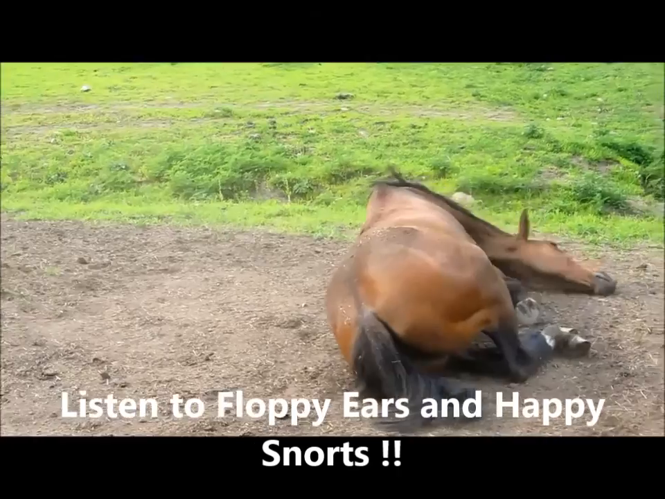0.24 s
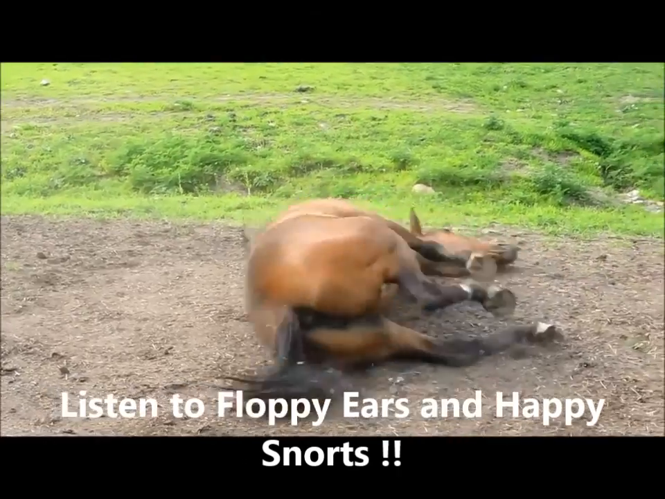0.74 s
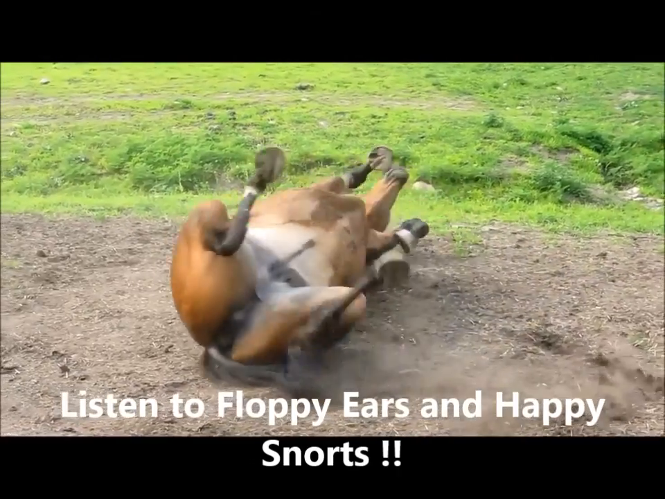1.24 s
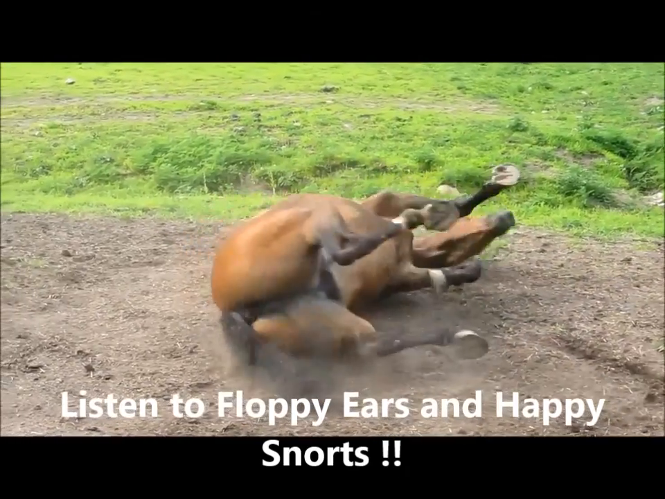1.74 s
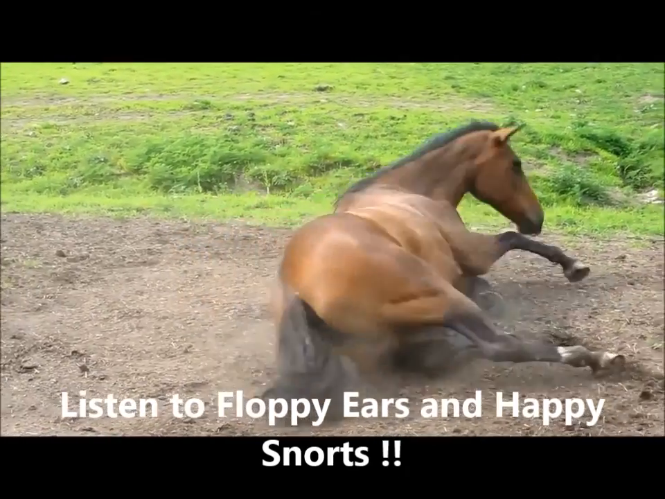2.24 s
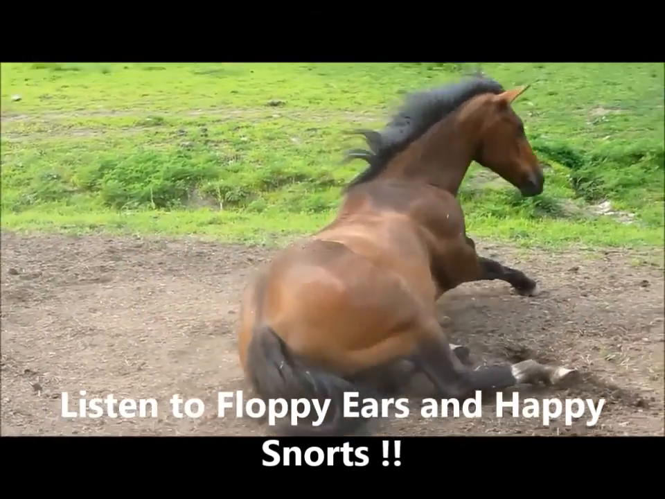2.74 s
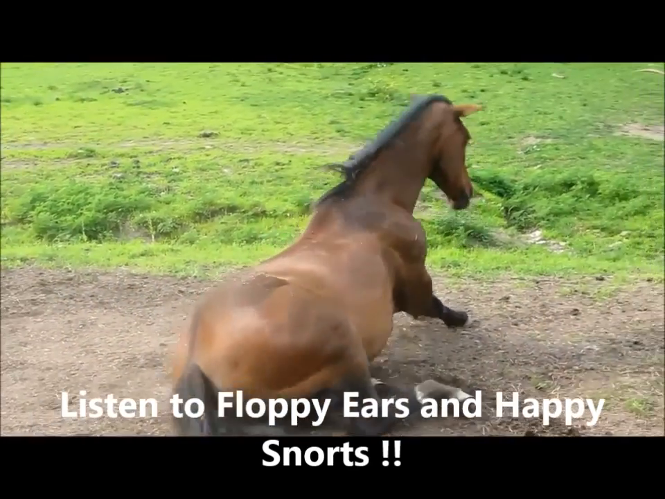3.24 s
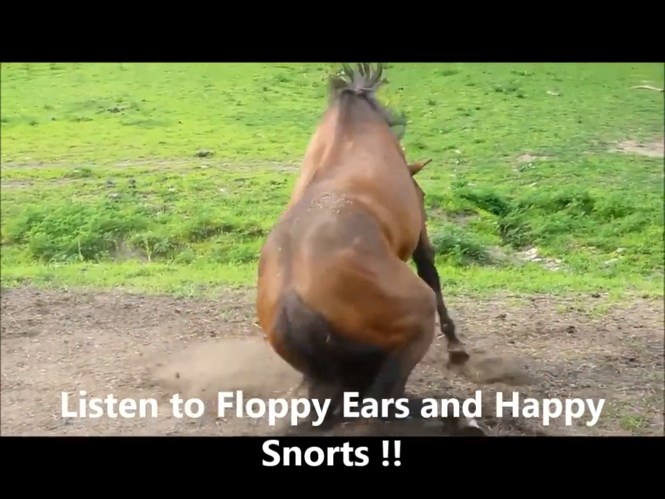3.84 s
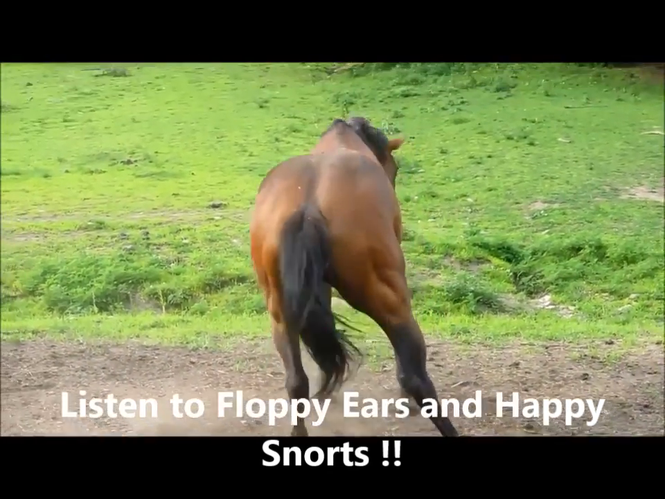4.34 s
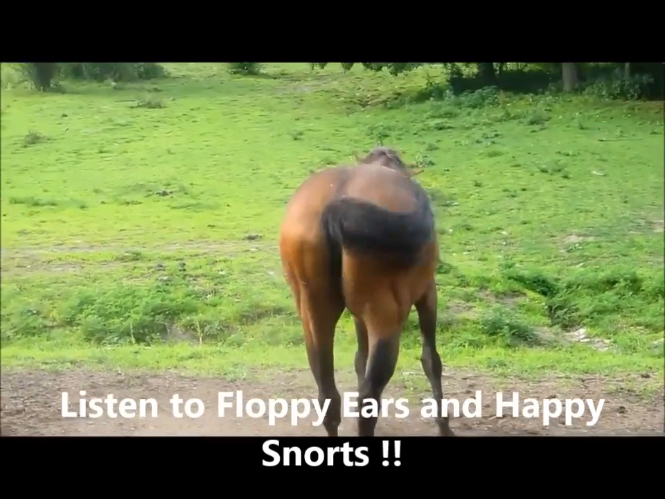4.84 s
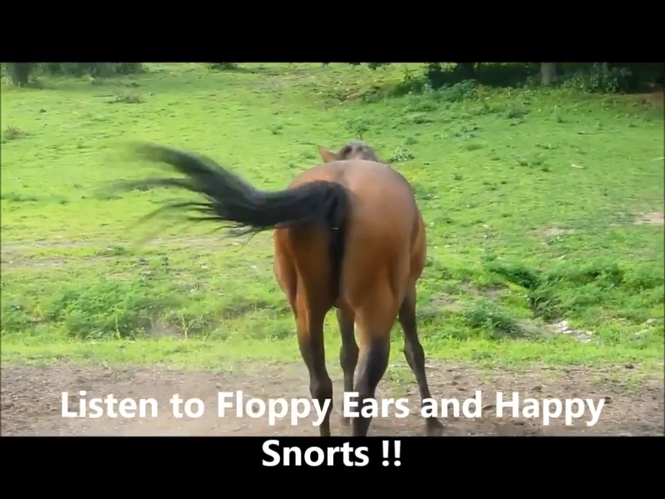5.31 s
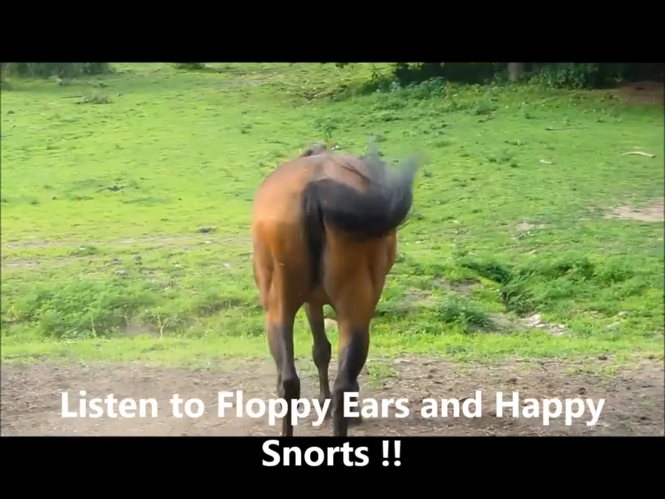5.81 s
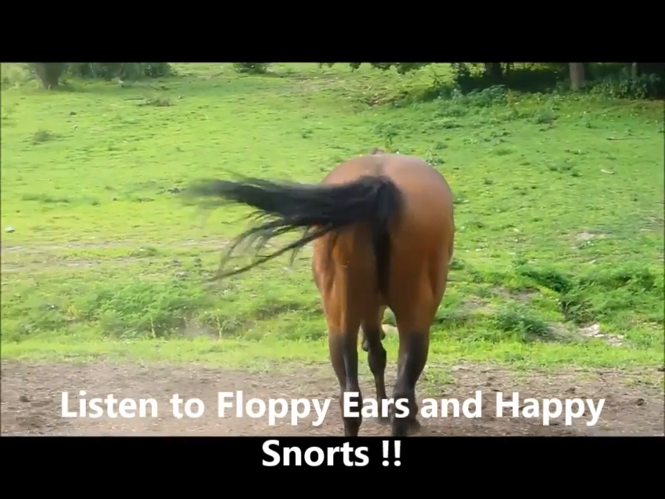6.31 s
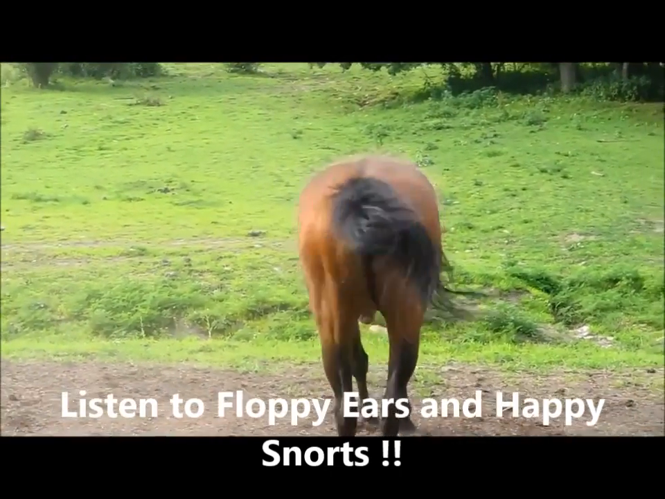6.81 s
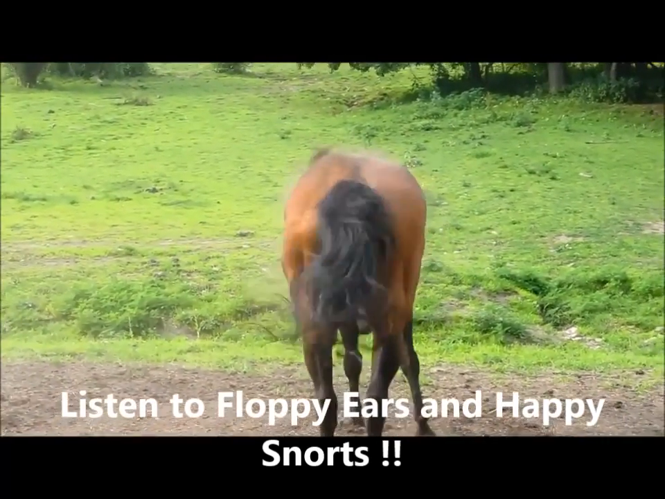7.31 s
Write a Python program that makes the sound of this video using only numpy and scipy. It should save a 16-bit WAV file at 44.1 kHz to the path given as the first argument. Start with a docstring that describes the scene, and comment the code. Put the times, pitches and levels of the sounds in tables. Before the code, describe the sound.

A horse rolls in dry dirt, heaves up, groans, snorts twice and shakes, while a small bird chirps steadily nearby.

```python
"""Horse rolling in a dry paddock

A horse rolls in sliding dirt, heaves itself up, swishes its tail and shakes. It groans as slack
airway tissue chops its breath, and snorts twice through flapping nostrils. Close by, a small bird
repeats one high, dipping chirp, echoed briefly by ground, fences and trees. Faint airy whistles
and an outdoor hush lie under it all."""
import sys
import numpy as np
from scipy import signal
from scipy.fft import rfft, irfft, next_fast_len
from scipy.io import wavfile
from scipy.ndimage import uniform_filter1d

SR = 44100
rng = np.random.default_rng(int(sys.argv[2]) if len(sys.argv) > 2 else 0)


def wrap_up_sound(samples):
    """Save the sound to the file named by the first command line argument, as 16-bit audio."""
    columns = np.atleast_2d(samples).T
    # keep every value between -1 and 1, then stretch to whole-number steps
    tamed = np.clip(columns, -1, 1)
    steps = np.round(tamed * 32767).astype(np.int16)
    wavfile.write(sys.argv[1], SR, steps)


N = 333396
T = np.arange(N) / SR


def from_db(db):
    return 10 ** (np.asarray(db) / 20)


def unit_rms(x):
    return x / np.sqrt(np.mean(x ** 2) + 1e-20)


def curve_at(rows, x):
    """Interpolate the remaining columns at x along the first."""
    knots, *columns = np.transpose(rows)
    return [np.interp(x, knots, column) for column in columns]


def add(out, start_s, x):
    """Mix x in at start_s."""
    at = int(round(start_s * SR))
    x = x[..., max(0, -at):max(0, N - at)]
    out[..., max(0, at):max(0, at) + x.shape[-1]] += x


def drift(rate_hz, size=N):
    """Smooth random wander, rms about 1."""
    hop, settle = 40, 2000
    pole = np.exp(-2 * np.pi * rate_hz * hop / SR)
    noise = rng.standard_normal(size // hop + settle + 2)
    slow = signal.lfilter([1], [1, -2 * pole, pole * pole], noise)[settle:]
    return np.interp(np.arange(size) / hop, np.arange(len(slow)), unit_rms(slow))


def band(x, centre_hz, width_hz, order=2, kind="band"):
    edges_hz = [max(centre_hz - width_hz / 2, 20), centre_hz + width_hz / 2]
    return signal.sosfilt(signal.butter(order, edges_hz, kind, fs=SR, output="sos"), x)


def resonate(x, modes):
    """Parallel resonances (centre_hz, width_hz, gain_db), rms 1."""
    return unit_rms(sum(from_db(db) * band(x, hz, width_hz) for hz, width_hz, db in modes))


def white_pair(correlation, size):
    """Stereo white noise."""
    mid, side = rng.standard_normal((2, size))
    return np.sqrt((1 + correlation) / 2) * mid + np.sqrt((1 - correlation) / 2) * side * [[1], [-1]]


# left-right likeness: freq_hz, correlation
STEREO_CORRELATION = [(60, 0.74), (600, 0.48), (1500, 0.5), (3000, 0.2), (6000, 0.44), (14000, 0.56)]
def coloured(spectrum, grain_db=0):
    """Shaped stereo noise, rms 1; unequal grains make it crackle."""
    size = next_fast_len(N)
    log_hz = np.log(np.arange(size // 2 + 1) * SR / size + 1)

    def per_bin(points):
        hz, values = np.transpose(points)
        return np.interp(log_hz, np.log(hz), values)

    grains = from_db(grain_db * np.minimum(rng.exponential(1, size), 7))
    mid, side = rfft(rng.standard_normal((2, size)) * grains)
    correlation = per_bin(STEREO_CORRELATION)
    stereo = np.sqrt(1 + correlation) * mid + np.sqrt(1 - correlation) * side * [[1], [-1]]
    return unit_rms(irfft(from_db(per_bin(spectrum)) * stereo, size)[:, :N])


def swells(rows, rest_db):
    """Gain of pushes that build and die away over a resting level."""
    power = sum(from_db(db - 20 * np.maximum((peak_s - T) / rise_s, (T - peak_s) / fall_s)) ** 2
                for peak_s, rise_s, fall_s, db in rows)
    return np.sqrt(power + from_db(rest_db) ** 2)


# body and hooves sliding, pressing: peak_s, rise_20db_s, fall_20db_s, level_db
SLIDES = [(0, .1, 0.12, -57), (1.12, 0.6, 1.0, -55), (2.325, .045, .05, -52), (2.35, .6, .6, -66),
          (2.51, .05, .05, -56.5), (4.08, 1.05, 0.75, -48.5), (4.68, 0.5, 0.1, -56),
          (5.06, 0.9, 0.1, -55.5), (5.96, .4, 0.5, -60), (6.35, .25, 0.18, -56.5)]
PRESSES = [(1.16, .2, .15, -59), (2.3, 2.2, 1.6, -64), (3.045, .025, .07, -51.5), (3.2, .05, .06, -62),
           (4.25, .9, 0.65, -54), (4.42, 0.15, .05, -52), (4.66, .05, 0.2, -57)]
# loose dirt, pressed ground: freq_hz, density_db
SAND_SPECTRUM = [(500, -8), (850, 9), (1400, -0.5), (2500, 2), (5000, 0.5), (7000, -3), (9500, -4.5),
                 (12000, -3), (15500, -14)]
GROUND_SPECTRUM = [(25, 2), (55, 1), (130, 3.5), (230, 0.5), (320, 1.5), (480, -21), (1000, -26),
                   (3000, -55)]
def rolling(stones_per_s=90.0, stones_db=-6.5, lumps_db=2.0):
    """Dry grains slide in clumps and small stones tick over the dull rubbing of the body."""
    sand = from_db(2 * drift(21)) * coloured(SAND_SPECTRUM, grain_db=1.0)
    hits = rng.random(N) < stones_per_s / SR
    ticks = hits * rng.standard_normal(N) * from_db(rng.normal(0, 2.2, (2, N)))
    stone_modes = [(1540, 1700, -1.5), (3250, 2350, 4.5), (11100, 11000, -6.5)]
    stones = from_db(stones_db) * resonate(ticks, stone_modes)
    rubbing = from_db(lumps_db * drift(12)) * coloured(GROUND_SPECTRUM)
    return swells(SLIDES, rest_db=-68) * (sand + stones) + swells(PRESSES, rest_db=-74.5) * rubbing


# start_s, length_s, first_hz, last_hz, hum_db, swell_db, air_db, hiss_re_air_db, first_rough, last_rough
GROANS = [(3.745, .275, 164, 82, -33.6, 14, -45, -1.5, .22, .5),
          (5.685, 0.092, 61.8, 60, -47.5, 13, -55, 1, .5, 0.27),
          (5.93, .34, 128.1, 58.1, -38, 28, -53.5, -9, .12, .7),
          (6.48, .25, 98, 87.6, -52.5, 3, -54.5, -11, 1.0, .3),
          (6.738, 0.12, 95.8, 91.3, -40.5, 3.3, -48, -9, .4, 0.63)]
# airway resonances: centre_hz, width_hz, gain_db
CHEST_MODES = [(118.5, 57, 0.5), (201, 79, 1)]
THROAT_AIR_MODES = [(688, 200, 9.5), (789, 100, 8.5), (1197, 145, 4.5), (1400, 170, 7)]
THROAT_HISS_MODES = [(2323, 240, 2), (3020, 300, -2), (3600, 1500, -7)]
def groans(jitter=0.16, shimmer_db=17.0, gating=0.58, rasp_db=-5, crest_share=0.83, release_s=0.018):
    """Slack airway tissue beats unevenly and ever slower, chopping the air as the groan swells."""
    out, size = np.zeros((2, N)), SR // 2
    t = np.arange(size) / SR
    for (start_s, length_s, first_hz, last_hz, hum_db, swell_db, air_db, hiss_db,
         first_rough, last_rough) in GROANS:
        along = np.clip(t / length_s, 0, 1)
        pitch_hz = first_hz + (last_hz - first_hz) * along ** 1.6
        rough = first_rough + (last_rough - first_rough) * along ** 2
        effort_db = -swell_db * (1 - along / crest_share) ** 2
        phase = 2 * np.pi * np.cumsum(pitch_hz * (1 + jitter * rough * drift(59, size))) / SR
        pulses = sum(np.cos(k * phase) / np.sqrt(k) for k in range(1, 8))
        hum = resonate(pulses * from_db(shimmer_db * rough * drift(36, size)), CHEST_MODES)
        hum = hum / np.sqrt(uniform_filter1d(hum ** 2, size=1400) + 1e-4)   # even out the level
        rasp = from_db(rasp_db) * rough * resonate(rng.standard_normal(size), [(240, 92, 0)])
        opening = unit_rms(np.exp(gating * np.cos(phase)))
        flow = white_pair(0.99, size) * opening
        air = resonate(flow, THROAT_AIR_MODES) + from_db(hiss_db) * resonate(flow, THROAT_HISS_MODES)
        groan = from_db(hum_db + effort_db) * (hum + rasp) + from_db(air_db + 0.32 * effort_db) * air
        add(out, start_s, groan * np.clip((length_s - t) / release_s, 0, 1))
    return out


# blast curve per snort: time_s, force_db
SNORT_BLASTS = [
    [(4.015, -44), (4.035, -33), (4.141, -35), (4.267, -46), (4.295, -57), (4.36, -59)],
    [(6.24, -57), (6.262, -37.5), (6.284, -42.5), (6.306, -29), (6.322, -31), (6.328, -46), (6.352, -34),
     (6.398, -46), (6.424, -41), (6.44, -55), (6.45, -56)],
]
# mix per snort at ref_db: nose_db, hiss_db, thrum_db
SNORT_MIXES = [(-34.3, -37.8, -40.5), (-33.7, -40.5, -41)]
# head resonances: centre_hz, width_hz, gain_db
NOSE_MODES = [(855, 208, -2.5), (1098, 230, -3.5), (1407, 284, -3)]
NOSTRIL_MODES = [(2283, 210, 1.5), (2630, 750, 0.5), (2845, 650, -8), (3370, 140, -3.5), (4330, 750, -2.5),
                 (5900, 1160, -12.5)]
def snorts(flap_hz=52, jitter=0.36, lurch_db=1.5, ref_db=-35, attack_s=.015, release_s=.025,
           hiss_fade_db_per_s=14):
    """A blast flaps the nostrils, one puff per flap; the hiss fades as they slacken."""
    out, size = np.zeros((2, N)), SR // 2
    t = np.arange(size) / SR
    thrum_modes = [(118, 72, -3), (223, 83, 2.5), (323, 130, -10.5)]
    for blast, (nose_db, hiss_db, thrum_db) in zip(SNORT_BLASTS, SNORT_MIXES):
        start_s, end_s = blast[0][0], blast[-1][0]
        force_db = curve_at(blast, start_s + t)[0] - ref_db
        phase = 2 * np.pi * np.cumsum(flap_hz * (1 + jitter * drift(46, size))) / SR
        opening = unit_rms(np.exp(.45 * np.cos(phase)))
        nose = resonate(white_pair(0.99, size) * opening, NOSE_MODES)
        nose *= from_db(nose_db + force_db)
        hiss = resonate(white_pair(0.7, size) * opening, NOSTRIL_MODES)
        hiss *= from_db(hiss_db + .95 * force_db - hiss_fade_db_per_s * t)
        thrum = resonate(white_pair(1.0, size) * opening, thrum_modes)
        thrum *= from_db(thrum_db + .68 * force_db + lurch_db * drift(25, size))
        gate = np.minimum(t / attack_s, 1) * np.exp(-np.maximum(start_s + t - end_s, 0) / release_s)
        add(out, start_s, (nose + hiss + thrum) * gate)
    return out


# skin thud, coat slap: freq_hz, density_db
SKIN_SPECTRUM = [(15, -34), (42, 1), (80, -8), (130, -8), (220, -11), (330, -24.5), (600, -49), (2000, -65)]
COAT_SPECTRUM = [(300, -3), (800, 0.5), (1600, 1.5), (2500, 1), (4500, -1), (6500, -7), (10000, -6.5),
                 (13000, -4), (14500, -11), (15500, -18)]
def shake(hold_from_s=6.9, hold_to_s=7.32, rise_20db_s=.14, fall_20db_s=0.23,
          swing_hz=15.6, crest_s=7.212, skin_db=-46.5, coat_db=-47.5):
    """Loose skin thuds on every swing while mane and coat slap to and fro."""
    before = np.maximum(hold_from_s - T, 0) / rise_20db_s
    after = np.maximum(T - hold_to_s, 0) / fall_20db_s
    vigour_db = -20 * (before + after ** 2)
    swing = np.cos(2 * np.pi * swing_hz * (T - crest_s))
    skin = from_db(skin_db + vigour_db + 5.0 * (swing - 0.23)) * coloured(SKIN_SPECTRUM)
    slap_db = 3.6 * swing + 1.8 * drift(60)
    coat = from_db(coat_db + vigour_db + slap_db) * coloured(COAT_SPECTRUM, grain_db=3.0)
    return skin + coat


# start_s, level_db, ring_hz, t60_s, crack_db
KNOCKS = [(1.163, -44.5, 1200, 0.0053, -8), (1.389, -38, 1940, 0.0042, -8),
          (1.650, -40.5, 2200, 0.006, -19), (2.401, -44.5, 1960, 0.0079, -19),
          (2.503, -45.5, 3000, 0.0069, 7), (3.031, -44, 353, 0.027, 11.5), (3.314, -44, 3500, .006, 8),
          (3.537, -45.5, 1660, 0.013, -21), (3.624, -39.5, 780, 0.0066, -23),
          (3.7348, -30, 1470, 0.0092, -2), (3.96, -40, 930, .010, -16), (4.389, -36.5, 2250, 0.0038, -20),
          (4.5795, -32.5, 4300, 0.008, 12.5), (4.8925, -39.5, 970, 0.0075, 13.5),
          (6.460, -35.5, 960, 0.019, -17), (6.687, -39.5, 896, 0.016, -28), (6.894, -41.5, 730, 0.025, -8),
          (7.0935, -25, 2480, 0.0017, -4), (7.2849, -16, 2970, 0.0027, -20),
          (7.287, -18.5, 2270, 0.007, -26), (7.36, -36, 2720, 0.0064, -23),
          (7.4255, -34.5, 2830, 0.0065, -1)]
def knocks(grit_db=-7, crack_t60_s=0.0067, build_cycles=0.99):
    """Grit, hoof knocks and slaps: a damped ring, a spray near its pitch and a bright crack."""
    out, t = np.zeros((2, N)), np.arange(SR // 15) / SR
    for start_s, level_db, ring_hz, t60_s, crack_db in KNOCKS:
        envelope = (1 - np.exp(-(t * ring_hz / build_cycles) ** 2)) * from_db(-60 * t / t60_s)
        grit = from_db(grit_db) * resonate(white_pair(0.97, len(t)), [(ring_hz, ring_hz, 0)])
        body = (np.sin(2 * np.pi * ring_hz * t) + grit) * envelope / envelope.max()
        crack = resonate(white_pair(0.42, len(t)), [(11600, 6600, 7), (3900, 6000, 3)])
        crack *= from_db(crack_db - 60 * t / crack_t60_s) / 2
        add(out, start_s, from_db(level_db) * (body + crack))
    return out


# peak_s, half_width_s, level_db
SWISHES = [(1.02, 0.057, -53), (1.28, 0.21, -59), (4.791, 0.025, -46), (4.895, 0.017, -54),
           (4.935, 0.022, -49), (5.285, 0.023, -50.5), (5.79, 0.028, -47), (6.29, .035, -50.5)]
# tail hair: freq_hz, density_db
HAIR_SPECTRUM = [(2000, -16), (4000, -12.5), (6500, -10.5), (9500, -8), (12000, -3.5), (14000, -8),
                 (15500, -17)]
def tail_swishes():
    """Tail hair sweeps the ground, then whips the air and the legs."""
    sweep = sum(from_db(db) / (1 + ((T - peak_s) / half_width_s) ** 2 / 2) ** 2
                for peak_s, half_width_s, db in SWISHES)
    return sweep * coloured(HAIR_SPECTRUM, grain_db=3.0)


# start_s, length_s, top_hz, dip_hz, early_db, late_db, fundamental_db, overtones_db, pan_db
CHIRPS = [(-0.008, 0.041, 4950, 4746, -39.5, -36.5, -21.5, -27, 2),
          (.077, .037, 4840, 4620, -39, -37, -22, -28, 2),
          (.263, .12, 4755, 4530, -39, -42, -16, -29.5, .5),
          (.626, .12, 4850, 4420, -36.5, -42, -18.5, -31, 2),
          (1.026, .12, 4855, 4413, -36.5, -33.5, -21, -27.5, 3),
          (1.46, .12, 4845, 4405, -35.5, -37, -20, -26, 3.5),
          (1.839, .13, 4906, 4497, -33.5, -32.5, -21.5, -26.5, 1.5),
          (2.25, .13, 5060, 4543, -39, -38, -16.5, -23, 1),
          (2.682, .14, 4990, 4504, -41.5, -43, -14.5, -24, 1),
          (3.166, .13, 4890, 4416, -44.5, -42.5, -16, -25.5, 1),
          (3.664, .12, 4904, 4350, -30, -28.5, -22, -25, 2),
          (4.425, .12, 4840, 4416, -27, -27.5, -23, -23, 2.5),
          (4.936, .12, 4840, 4350, -26, -30, -20, -22.5, 0),
          (5.564, .12, 4836, 4315, -29.5, -28, -16.5, -20.5, -3),
          (6.208, .11, 4733, 4345, -25.5, -28.5, -22, -25, -2.5),
          (6.909, .1, 4790, 4290, -30, -35, -22.5, -28, 4)]
# one chirp: length_share, height (dip 0, top 1), gain
CHIRP_SHAPE = [(0, -0.26, 0.14), (.06, 0.873, 0.72), (.13, 1.06, 1), (.2, .9, 1), (.35, .32, 0.74),
               (.5, .08, 0.89), (.7, -.02, 0.92), (.84, 0.049, 0.94), (.94, 0.417, 0.7), (1, -0.048, 0)]
# bird's bearing as the microphone turns: time_s, left_lead_ms
BIRD_BEARING = [(0, 0.032), (2.6, -0.03), (3.7, 0.013), (4.95, -0.021), (5.6, -0.0554), (6.2, -.11),
                (7, -0.13)]
def bird(waver=0.0021, flutter_db=2.2, strain_db=6.0, ref_db=-35, scatter_db=-43.5):
    """Chirps leap, sag and lift, carried by the second partial. Returns direct and scattered sound."""
    direct, scattered, size = np.zeros((2, N)), np.zeros((2, N)), SR // 6
    t = np.arange(size) / SR
    sides = np.array([[.5], [-.5]])
    for (start_s, length_s, top_hz, dip_hz, early_db, late_db,
         fundamental_db, overtones_db, pan_db) in CHIRPS:
        height, gain = curve_at(CHIRP_SHAPE, t / length_s)
        lead_ms, = curve_at(BIRD_BEARING, start_s)
        level_db = np.interp(t / length_s, [.3, .6], [early_db, late_db])
        fundamental_hz = (dip_hz + (top_hz - dip_hz) * height) / 2 * (1 + waver * drift(150, size))
        phase = 2 * np.pi * (np.cumsum(fundamental_hz) / SR + fundamental_hz * lead_ms / 1000 * sides)
        bright_db = overtones_db + strain_db * (height - .5)   # the strained top is richest
        rolloff_db = 5 - .2 * (early_db - ref_db)
        partials_db = [fundamental_db, 0, bright_db, bright_db + 1,
                       bright_db - rolloff_db, bright_db - 2 * rolloff_db]
        partials = [from_db(db + flutter_db * drift(52, size)) * np.sin(k * phase)
                    for k, db in enumerate(partials_db, 1)]
        envelope = np.sqrt(2) * gain * np.clip((length_s - t) / 0.0056, 0, 1)
        add(direct, start_s, sum(partials) * envelope * from_db(level_db + pan_db * sides))
        # scatter favours the low partials and the dip
        returning = sum(partials[:2]) + from_db(-4.5) * sum(partials[2:])
        return_db = scatter_db + .35 * (level_db - ref_db) - 2.0 * (height - .5)
        add(scattered, start_s, returning * envelope * from_db(return_db))
    return direct, scattered


def foliage_scatter(x, stir_hz=68.0):
    """Moving leaves make echoes waver in strength and phase, spreading a tone."""
    analytic = signal.hilbert(x, next_fast_len(N), axis=1)[:, :N]
    return np.real(analytic * (drift(stir_hz) + 1j * drift(stir_hz))) / np.sqrt(2)


def yard_echo(x, far_t60_s=0.61, near_t60_s=0.09, onset_s=0.0049, near_db=10.5, slap_db=-4.5,
              trees_hz=4190.0, trees_db=1.5):
    """Ground and fences reflect first, some as distinct slaps; trees add a thin tail."""
    t = np.arange(SR * 2 // 3) / SR
    near, far = rng.standard_normal((2, 2, len(t)))
    far = far + from_db(trees_db) * band(far, trees_hz, width_hz=260, order=1)
    response = far * from_db(-60 * t / far_t60_s) + near * from_db(near_db - 60 * t / near_t60_s)
    response *= np.clip(t / onset_s, 0, 1)
    response /= np.sqrt(np.sum(response ** 2) / 2)
    for side in response:
        slaps_s = rng.uniform(.012, .04, 2)
        side[(slaps_s * SR).astype(int)] += from_db(slap_db)
    return from_db(-1.5) * signal.fftconvolve(x, response, axes=1)[:, :N]


# start_s, length_s, from_hz, to_hz, level_db
WHISTLES = [(2.469, 0.11, 3050, 2790, -62.5), (3.661, 0.11, 2940, 2900, -55),
            (3.806, 0.092, 2680, 3020, -49.5), (3.924, 0.08, 3440, 3890, -49),
            (5.278, .16, 2710, 3150, -64.5), (6.117, 0.038, 2780, 2830, -62)]
def whistles(spread_hz=70.0):
    """Narrow gliding bands of air noise swell and fade."""
    out, size = np.zeros((2, N)), SR // 5
    t = np.arange(size) / SR
    for start_s, length_s, from_hz, to_hz, level_db in WHISTLES:
        along = np.clip(t / length_s, 0, 1)
        phase = 2 * np.pi * np.cumsum(from_hz + (to_hz - from_hz) * along) / SR
        air = drift(spread_hz, size) * np.cos(phase) + drift(spread_hz, size) * np.sin(phase)
        add(out, start_s, from_db(level_db) * np.sin(np.pi * along) * air)
    return out


# outdoor background: freq_hz, density_db
HUSH_SPECTRUM = [(15, -42), (25, -5), (75, 1.5), (144, -3), (359, 1.5), (523, -1), (945, -0.5),
                 (3720, -12.5), (4500, -5), (5140, -15.5), (7100, -19.5), (7910, -36), (9050, -18),
                 (12800, -29), (15500, -21)]
def hush(level_db=-57):
    """Faint, steady outdoor noise."""
    return from_db(level_db) * coloured(HUSH_SPECTRUM)


def scene(horse_send_db=-18.5):
    """Horse and bird share the open yard."""
    chirps, scattered = bird()
    horse = groans() + snorts() + rolling() + tail_swishes() + shake() + knocks()
    background = hush() + whistles()
    echo = yard_echo(foliage_scatter(scattered) + from_db(horse_send_db) * horse)
    return horse + chirps + echo + background


def record(dry, notch_hz=8200, cutoff_hz=15850):
    """The microphone has a deep treble notch; the top is cut."""
    notched = band(dry, notch_hz, width_hz=1100, kind="bandstop")
    return signal.sosfilt(signal.ellip(10, .3, 70, cutoff_hz, fs=SR, output="sos"), notched)


dry = scene()
out = record(dry)
wrap_up_sound(out)
```